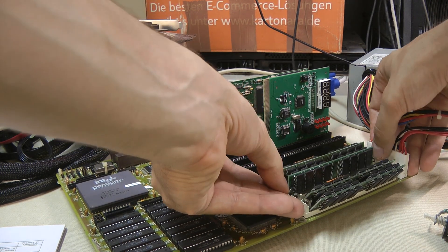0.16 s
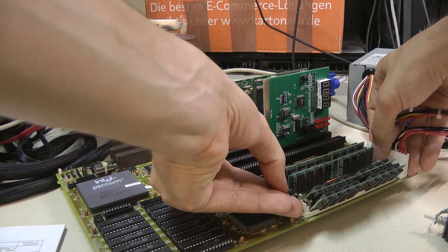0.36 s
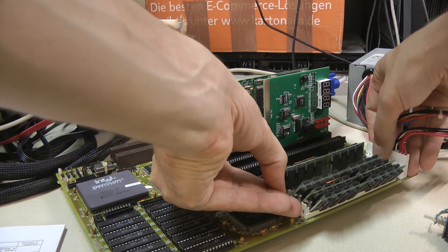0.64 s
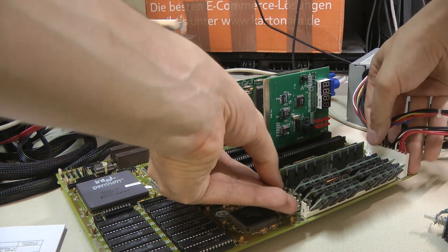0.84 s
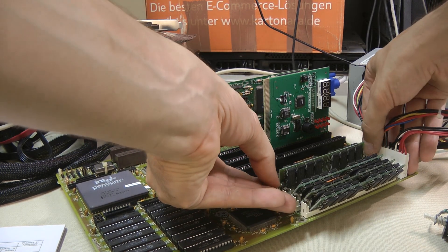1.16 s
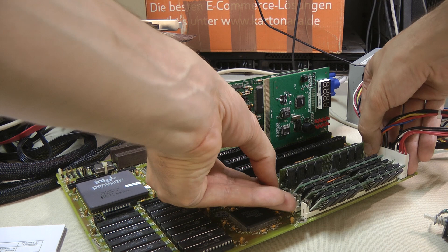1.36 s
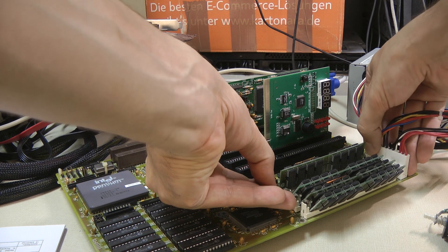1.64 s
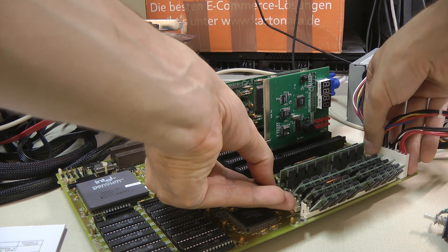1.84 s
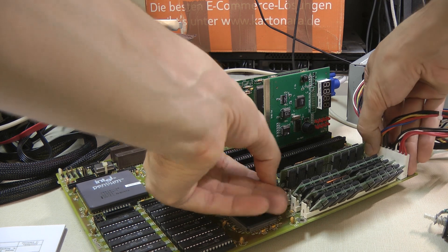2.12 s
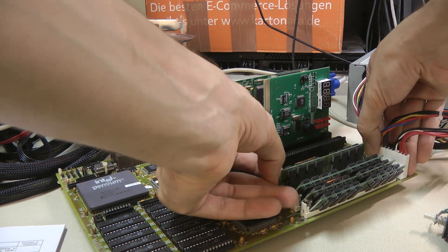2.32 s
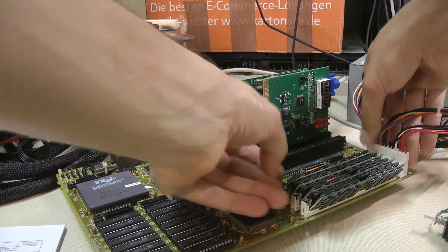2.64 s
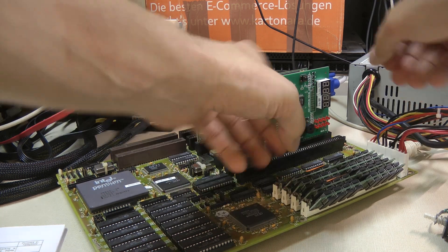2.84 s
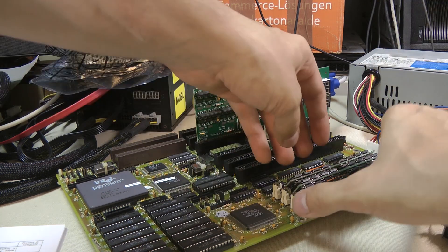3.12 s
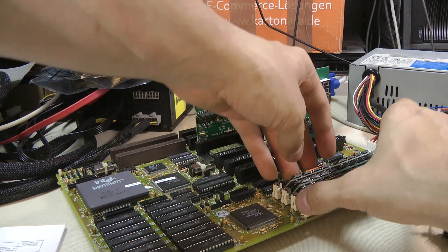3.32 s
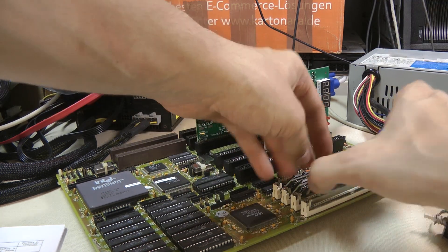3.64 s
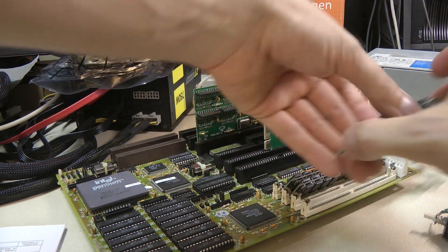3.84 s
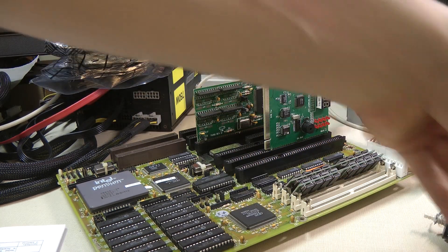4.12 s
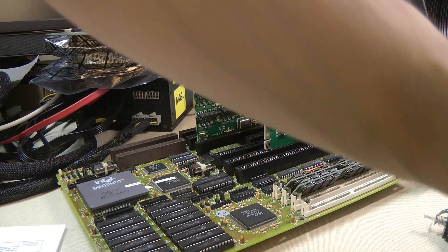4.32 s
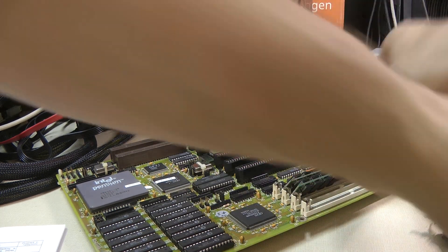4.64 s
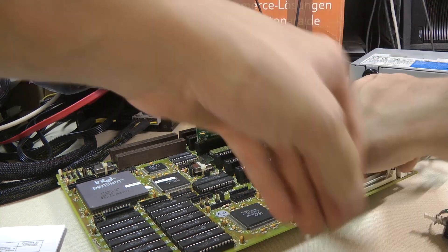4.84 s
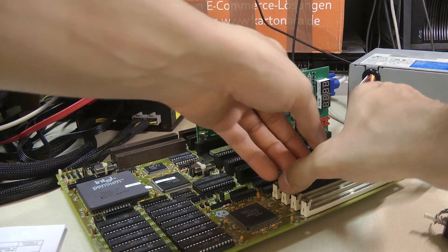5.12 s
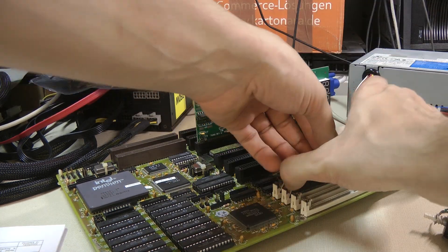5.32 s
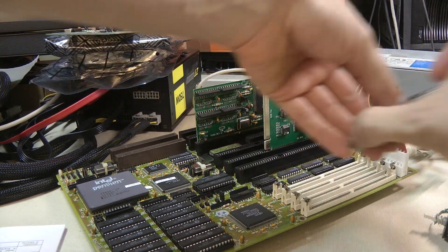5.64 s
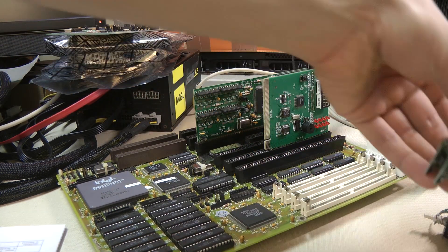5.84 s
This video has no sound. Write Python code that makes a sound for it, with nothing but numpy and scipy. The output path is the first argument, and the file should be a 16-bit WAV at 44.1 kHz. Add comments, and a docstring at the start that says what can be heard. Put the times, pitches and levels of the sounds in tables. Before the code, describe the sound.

Retaining clips crack open and small circuit modules click and knock loose on a desk, with light finger rubbing and a quiet computer fan.

```python
"""Metal clips snap and memory modules knock as they are levered out of slots on a bare circuit board.
Each contact is a rattle of tiny blows through damped board modes, with a diffuse room tail.
Fingers and module edges rub: swells of clumped noise. The desk rumbles and thuds in its own low modes.
Short low bumps sit mostly at the hardest snaps. A computer fan nearby is shaped noise plus unsteady tones."""
import sys
import numpy as np
from scipy import signal
from scipy.fft import rfft, irfft, next_fast_len
from scipy.io import wavfile
from scipy.ndimage import map_coordinates

SR = 44100
rng = np.random.default_rng(int(sys.argv[2]) if len(sys.argv) > 2 else 0)


def master_out(mix):
    """Clip the mix to full scale and print it as 16-bit PCM to the path in sys.argv[1]."""
    frames = np.transpose(np.atleast_2d(mix))
    ceiling = np.clip(frames, -1, 1)
    pcm = np.round(ceiling * 32767).astype(np.int16)
    wavfile.write(sys.argv[1], SR, pcm)


N = 263277

# Snaps and knocks. Each row: start in seconds, peak of the direct sound in dB, favoured ring in Hz, its boost in dB,
# contact decay in ms, then relative colour in dB: knock (low), body (1900 Hz), treble (8500 Hz).
CONTACTS = [(0.529, -47, 3100, 13, 2.5, -26, -12, -9), (0.6003, -34, 3230, 11.5, 2.05, -11.5, -12.5, -10),
            (0.607, -36, 1830, 11, 3.6, -33, -23, -3), (0.7314, -50, 2700, 14, 1.8, -9, -17, -15),
            (0.8894, -46, 3550, 8, 3.1, -14.5, -12, -20), (1.5063, -48, 3330, 13, 3.2, -20, -17, -10),
            (1.703, -46, 2750, 8, 1.8, -30, 3, -27), (1.7075, -12, 2830, 11, 1.36, -25.5, -25, -11.5),
            (1.819, -50.5, 7400, 10, 1.2, -26, -22, -15), (2.0381, -46.5, 1950, 8, 1.57, -16, -8, -20),
            (2.4921, -10, 6770, 5, 0.64, -32, -35, -7.5), (2.4946, -17.5, 5700, 5.5, 1.3, -20, -17, -6.5),
            (2.7382, -41.5, 3500, 8.5, 2, -13.5, -7.5, -11.5),
            (2.7803, -39, 4940, 12.5, 2.1, -9.5, -22.5, -27.5),
            (3.331, -27.5, 3594, 5.5, 1.8, -23, -18, -17), (3.4487, -38, 6960, 8.5, 2.5, -23, -20, -13.5),
            (3.494, -36.5, 2820, 12, 1.9, -15, -16, -21), (3.624, -42.5, 860, 13.5, 2.2, -14, -26, -11),
            (3.7464, -43.5, 3580, 10.5, 4.5, -20, -10, -13), (3.758, -45.5, 1710, 15, 3.4, -15, -8, -30),
            (4.144, -45, 4500, 13, 4, -21, -6.5, -5), (4.4511, -13.5, 2010, 7, 2.7, -21, -10.5, -12.5),
            (4.4893, -13, 2390, 5.5, 1.48, -14, -13, -21), (4.6196, -24, 1260, 8.5, 2.2, -9.5, -14.5, -17),
            (4.6411, -28.5, 1560, 3, 3.5, -10, -8.5, -23), (4.802, -44.5, 1590, 10, 2.1, -9.5, -13, -14),
            (5.2122, -42, 4400, 7.5, 2.6, -17.5, -20.5, -16), (5.4285, -34, 867, 16.5, 3, -12, -13, -9),
            (5.434, -35, 886, 17, 2.7, -13, -14, -14), (5.471, -42.5, 1940, 13, 4.5, -13, -10.5, -13)]
# Modes of board, slots and clips. Each row: frequency in Hz, relative level in dB, t60 in seconds.
BOARD_MODES = [(757, -14, 0.046), (922, -2.5, 0.015), (1290, -7, 0.01495), (1776, -14.5, 0.018),
               (2132, 2, 0.0047), (2765, -7.5, 0.012), (3068, -3.5, 0.006), (3704, -2, 0.0052),
               (4344, -6, 0.0049), (4915, -1, 0.0037), (5647, -3.5, 0.0092), (6380, -1.5, 0.0043),
               (7424, -1.5, 0.0035), (8190, -4, 0.0034), (10060, 1, 0.0019)]
# Each mode leans to one microphone: typical gain there at 1 kHz, the opposite at the other; less at higher pitch.
SIDEWAYS_DB = 3.5
RING_WIDTH = 0.091  # bandwidth of the favoured ring over its pitch
# Room share of a contact: dB at knock 0, and dB per dB of knock.
SPREAD_DB, SPREAD_PER_KNOCK = 6, 0.6

# Decay of the room. Each row: frequency in Hz, t60 in seconds.
ROOM_T60 = [(150, 0.22), (1000, 0.22), (3000, 0.2), (8000, 0.18), (15000, 0.15)]

# Strokes of fingers and module edges. Each row: middle in seconds, half span in seconds,
# level in dB before the swell, centre in Hz.
STROKES = [(0.097, .012, -62.5, 3970), (0.768, 0.072, -62, 2570), (0.937, 0.09, -62, 3160),
           (1.048, 0.14, -65.5, 3180), (1.155, 0.045, -62, 3140), (1.446, 0.015, -60.5, 2200),
           (1.834, 0.077, -62.5, 4860), (2.202, 0.18, -65.5, 3900), (2.465, 0.042, -56, 2480),
           (2.696, 0.04, -62, 6300), (2.796, 0.022, -55, 4570), (3.635, 0.053, -47.5, 3000),
           (3.668, 0.033, -46.5, 3730), (4.061, 0.16, -65, 5260), (4.275, 0.12, -66, 5700),
           (4.383, 0.044, -65.5, 8500), (4.435, 0.013, -50, 4800), (4.779, 0.026, -64, 9800),
           (5.353, 0.082, -63, 4840), (5.407, 0.032, -50.5, 3500), (5.411, 0.025, -50, 1320),
           (5.51, 0.028, -63.5, 1360), (5.607, 0.072, -65, 6500), (5.79, 0.2, -65, 5900)]
STROKE_ROOM_DB, STROKE_RING_DB = -9.5, 3.5
# Stroke bandwidth: octaves at -67.5 dB, and added octaves per dB above that.
WIDTH_OCT, WIDER_OCT_PER_DB = 1, 0.11
# Faint restless rubbing. Each row: time in seconds, level in dB.
FIDGET_LEVEL = [(0.0, -67), (0.15, -78), (2.46, -72), (3.27, -76.5), (3.57, -68.5), (3.87, -79),
                (4.62, -65.5), (4.8, -73.5), (5.97, -74)]
FIDGET_HZ, FIDGET_SWING_DB = 3575, 2.5
# Where the hands work. Each row: time in seconds, left over right in dB.
HAND_PLACE = [(0, -1), (4.3, -1), (4.44, -3), (4.7, -1.5), (4.9, -0.5)]

# Desk modes. Each row: frequency in Hz, relative level in dB, t60 in seconds.
DESK_MODES = [(71.8, -24.5, 0.082), (113.5, -7.5, 0.08), (139.4, -6, .12), (225.6, 1.5, 0.054),
              (385, -0.5, 0.044)]
# Hands leaning on the desk. Each row: time in seconds, level in dB before the bass cut.
LEANING = [(0, -73), (2.3, -71.5), (2.9, -71), (4.7, -75), (4.9, -73.5), (5.97, -71)]
# Soft thuds of hands and board on the desk. Each row: start in seconds, drive in dB.
DESK_THUDS = [(0.525, -54.5), (0.607, -49), (1.439, -59), (2.038, -62), (2.498, -55.5), (4.492, -49),
              (4.63, -50.5), (4.799, -58), (5.211, -55)]
# Short low bumps, mostly at the hardest snaps. Each row: start in seconds, peak in dB midway between left and right.
LOW_BUMPS = [(1.706, -46), (2.493, -41), (2.62, -53), (4.451, -40.5)]

# Spectrum of the air rush. Each row: frequency in Hz, relative density in dB.
RUSH_SPECTRUM = [(30, -47), (50, -17.5), (105, -10.5), (370, -10.5), (430, -15.5), (530, -9.5), (1150, -10),
                 (1700, -16), (4000, -25.5), (8500, -31), (14800, -33.5), (15600, -46)]
RUSH_DB = -65.5
# Fan motor tones. Each row: frequency in Hz, mean peak level in dB.
MOTOR_TONES = [(937, -79.5), (1039, -71), (1141, -74.5), (1556, -77)]
# Likeness of the rush at both microphones. Each row: frequency in Hz, left-right correlation.
RUSH_LIKENESS = [(60, 0.63), (180, 0.182), (550, 0.47), (1650, 0.94), (4970, 0.94), (15000, 1)]

# Gain of the whole scene: it dips briefly after the snaps near 2.5 s, then returns. Each row: time in seconds, gain in dB.
LEVEL_GAIN = [(2.52, 3.5), (2.64, -3), (2.8, 0), (4.5, 2.5)]
TOP_HZ, EDGE_HZ = 16100, 500  # band limit: middle and half width of its slope


def snaps():
    """Rattling contacts crack and ring the board modes; the ring's energy spreads into the room."""
    out = np.zeros((2, N + SR))
    t = np.arange(SR // 20) / SR
    lead = 64  # samples kept free ahead of the board response
    sideways_db = SIDEWAYS_DB * (1000 / np.transpose(BOARD_MODES)[0]) ** .5
    for start_s, peak_db, ring_hz, ring_db, contact_ms, knock_db, body_db, treble_db in CONTACTS:
        struck, lean = rng.standard_normal((2, len(BOARD_MODES)))
        left_right = [ringing(BOARD_MODES, 1.5 * struck + side * sideways_db * lean) for side in (1, -1)]
        board = np.pad(left_right, ((0, 0), (lead, 0)))
        board[:, lead] += 10  # dry crack
        colour = [(100, knock_db - 17), (800, knock_db - 4), (1900, body_db), (3000, -14),
                  (6300, -13), (8500, treble_db), (15000, treble_db - 8)]
        board = filtered(board, lambda f: amp(along(colour, f)) * favour(f, ring_hz, ring_db))
        blows = rattle(t, contact_ms / 1000)
        direct = signal.fftconvolve(blows[None], board, axes=1)
        direct *= amp(peak_db) / np.abs(direct.mean(0)).max()
        around = board.mean(0) * np.linalg.norm(direct) / np.linalg.norm(board)
        room_db = SPREAD_DB + SPREAD_PER_KNOCK * knock_db
        add(out, start_s - lead / SR, direct)
        add(out, start_s - lead / SR, amp(room_db) * echo(around))
    return out[:, :N]


def rattle(t, contact_s):
    """Decaying burst of tiny blows; signs are iterated towards a flat spectrum."""
    sizes = np.abs(rng.standard_normal(len(t))) * t ** 0.4 * np.exp(-t / contact_s)
    blows = sizes * np.sign(rng.standard_normal(len(t)))
    for _ in range(6):
        flat = irfft(np.exp(1j * np.angle(rfft(blows))), len(t))
        blows = sizes * np.sign(flat)
    return blows


def favour(f, ring_hz, ring_db):
    """Resonant boost of one narrow ring: the place of contact favours it."""
    width_hz = RING_WIDTH * ring_hz
    return 1 + (amp(ring_db) - 1) * 1j * f * width_hz / (ring_hz ** 2 - f ** 2 + 1j * f * width_hz)


def ringing(modes, gain_db):
    """Impulse response of damped modes, each at its own extra gain."""
    hz, db, t60_s = np.transpose(modes)[..., None]
    t = np.arange(SR // 5) / SR
    decay = amp(db + np.reshape(gain_db, (-1, 1)) - 60 * t / t60_s)
    return np.sum(decay * np.sin(2 * np.pi * hz * t), 0)


def echo(x):
    """Room response: a new diffuse noise tail, partly alike at the two close-set microphones."""
    hz, t, z = signal.stft(rng.standard_normal((2, SR // 4)), SR, nperseg=256)
    decay = amp(-60 * t / along(ROOM_T60, hz)[:, None])
    mid, side = signal.istft(z * decay, SR, nperseg=256)[1]
    side_share = [(300, 0.34), (1500, 0.41), (4000, 0.16), (12000, 0.16)]  # (Hz, gain)
    side = filtered(side, lambda f: along(side_share, f))
    delayed = np.pad([mid + side, mid - side], ((0, 0), (200, 0)))
    return signal.fftconvolve(x[None], delayed / np.linalg.norm(mid), axes=1)


def rubs():
    """Sliding makes swells of uneven grains, coloured by centre pitch and faintly by the board."""
    out = np.zeros((2, N + SR))
    body = ringing(BOARD_MODES, 0)
    body[0] += 4.5  # unrung share
    clumps = amp(1.5 * wobble(60) + 3 * wobble(600))
    for middle_s, half_s, db, centre_hz in STROKES:
        at = max(round((middle_s - half_s) * SR), 0)
        size = round(2 * half_s * SR)
        grains = (rng.standard_normal(SR // 2) * np.resize(clumps[at:], SR // 2))[:size]
        touched = ringing(BOARD_MODES, 3.5 * rng.standard_normal(len(BOARD_MODES)))
        touched[0] = body[0]
        grains = signal.fftconvolve(grains, touched)[:size]
        grains = filtered(grains, lambda f: favour(f, centre_hz, STROKE_RING_DB))
        width_oct = max(WIDTH_OCT + WIDER_OCT_PER_DB * (db + 67.5), .3)
        grains = filtered(grains, band(centre_hz, width_oct))
        stroke = amp(db) * unit(grains) * np.hanning(size) ** 2
        add(out, at / SR, stroke)
        add(out, at / SR, amp(STROKE_ROOM_DB) * echo(stroke))
    return out[:, :N] + fidget(clumps, body)


def fidget(clumps, body):
    """Faint rubbing: clumped noise through the board, swinging in level, same in both channels."""
    grains = rng.standard_normal(N) * clumps * amp(FIDGET_SWING_DB * wobble(21))
    grains = signal.fftconvolve(grains, body)[:N]
    return amp(curves(FIDGET_LEVEL)[0]) * unit(filtered(grains, band(FIDGET_HZ, WIDTH_OCT)))


def band(centre_hz, octaves):
    """Bell-shaped response on an octave axis."""
    return lambda f: (1 + (np.log2((f + 1) / centre_hz) / octaves) ** 2) ** -2


def desk():
    """Lumpy noise and soft blows excite the desk modes; low bumps are added."""
    lumps = pair([(100, .7)]) * amp(2.5 * wobble(12))
    rumble = signal.fftconvolve(lumps, ringing(DESK_MODES, 0)[None], axes=1)[:, :N]
    out = np.pad(amp(curves(LEANING)[0]) * unit(rumble), ((0, 0), (0, SR)))
    soft = np.hanning(SR // 500)  # a padded contact starts no high tones
    for start_s, db in DESK_THUDS:
        thud = ringing(DESK_MODES, 2 * rng.standard_normal(len(DESK_MODES)))
        thud = amp(db) * np.convolve(thud, soft / soft.sum())
        add(out, start_s, thud)
        add(out, start_s, echo(thud))
    # bass cut: keeps the abrupt starts of the modes from adding deep bass
    out = filtered(out, lambda hz: 1 / (1 + (55 / (hz + 1)) ** 4))
    low_bumps(out)
    return out[:, :N]


def low_bumps(out):
    """Adds one-sided pulses, peaking after 1.6 ms, stronger in the left channel."""
    u = np.arange(SR // 10) / SR / 0.0016
    for start_s, peak_db in LOW_BUMPS:
        left_right_db = peak_db + np.array([[2.5], [-2.5]])
        add(out, start_s, amp(left_right_db) * u * np.exp(1 - u))


def fan():
    """Turbulent air as shaped noise, motor whine as tones wandering in level and phase."""
    noise = filtered(pair(RUSH_LIKENESS), lambda hz: amp(along(RUSH_SPECTRUM, hz)))
    rush = amp(RUSH_DB + .7 * wobble(2.8)) * unit(noise)
    t = np.arange(N) / SR
    tones = sum(amp(db + 0.61 * wobble(5.4)) * np.sin(2 * np.pi * hz * t + wobble(5.2))
                for hz, db in MOTOR_TONES)
    return rush + tones


def pair(alike):
    """Left and right noises, as alike as the (Hz, likeness) points say."""
    turn = lambda hz: np.arccos(np.clip(along(alike, hz), -1, 1)) / 2
    mid_side = lambda hz: np.array([np.cos(turn(hz)), np.sin(turn(hz))])
    mid, side = filtered(rng.standard_normal((2, N)), mid_side)
    return np.array([mid + side, mid - side])


def amp(db):
    """dB to amplitude."""
    return 10 ** (np.asarray(db) / 20)


def unit(x):
    """x at an rms of 1."""
    return x / np.sqrt(np.mean(x ** 2) + 1e-20)


def along(points, hz):
    """(Hz, value) points interpolated on a log axis."""
    f, v = np.transpose(points)
    return np.interp(np.log(hz + 1), np.log(f + 1), v)


def curves(rows):
    """One value per sample for each column after the time."""
    s, *cols = np.transpose(rows)
    return [np.interp(np.arange(N) / SR, s, c) for c in cols]


def wobble(rate_hz):
    """Smooth random curve through rate_hz knots a second."""
    knots = rng.standard_normal(int(N * rate_hz / SR) + 4)
    return map_coordinates(knots, [np.arange(N) * rate_hz / SR])


def filtered(x, response):
    """x through a complex response of frequency."""
    m = next_fast_len(x.shape[-1] + SR // 4)
    return irfft(rfft(x, m) * response(np.fft.rfftfreq(m, 1 / SR)), m)[..., :x.shape[-1]]


def add(out, start_s, sound):
    """Adds one sound to both channels of out."""
    at = max(round(start_s * SR), 0)
    out[:, at:at + sound.shape[-1]] += sound


def scene():
    """Hands placed left to right, plus desk and fan, under one level curve."""
    pan_db = curves(HAND_PLACE)[0]
    hands = (snaps() + rubs()) * amp([pan_db / 2, -pan_db / 2])
    return (hands + desk() + fan()) * amp(curves(LEVEL_GAIN)[0])


def record(dry):
    """Band limit of the camera: a squared-sine slope to silence around TOP_HZ."""
    slope = lambda hz: np.clip((TOP_HZ + EDGE_HZ - hz) / (2 * EDGE_HZ), 0, 1)
    return filtered(dry, lambda hz: np.sin(np.pi / 2 * slope(hz)) ** 2)


dry = scene()
out = record(dry)
master_out(out)
```